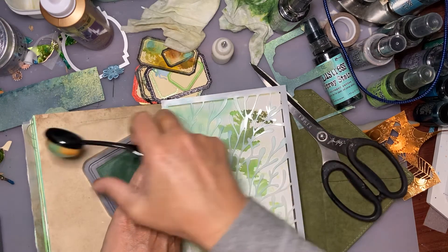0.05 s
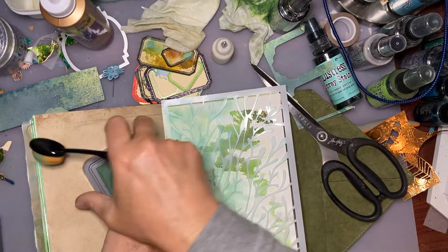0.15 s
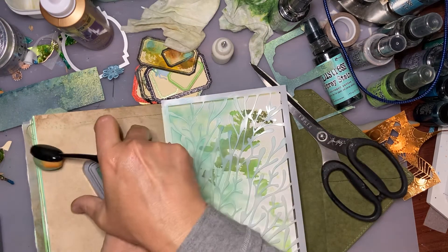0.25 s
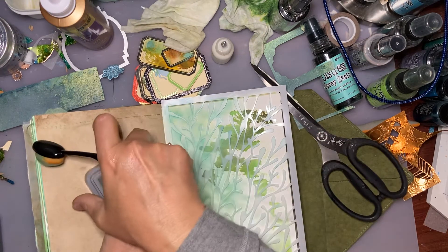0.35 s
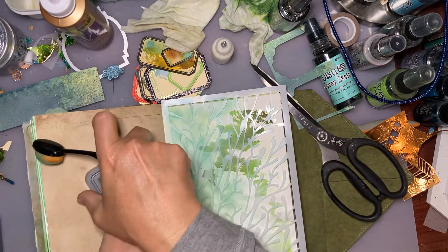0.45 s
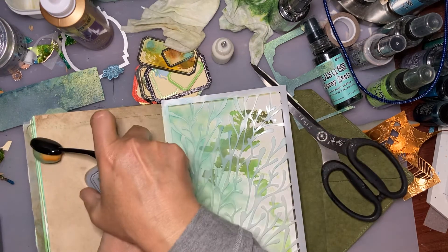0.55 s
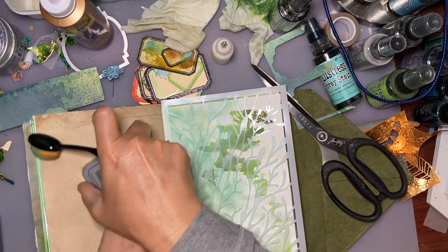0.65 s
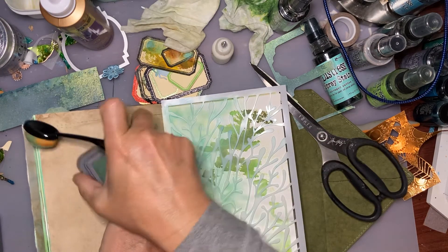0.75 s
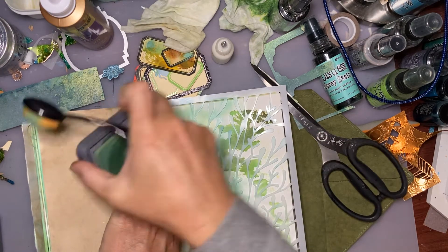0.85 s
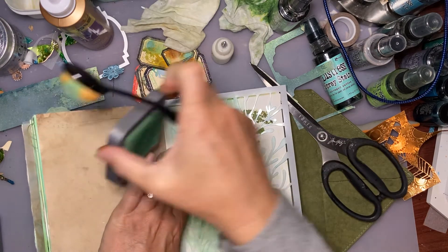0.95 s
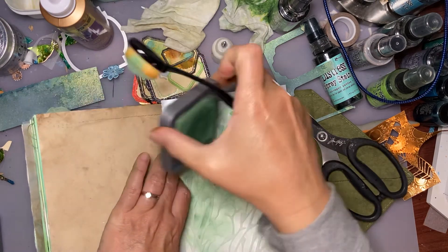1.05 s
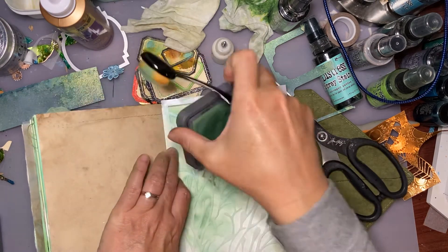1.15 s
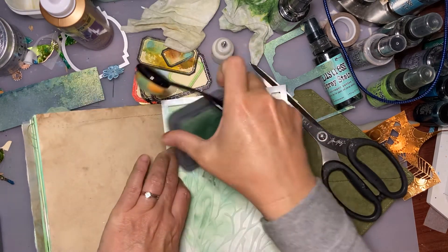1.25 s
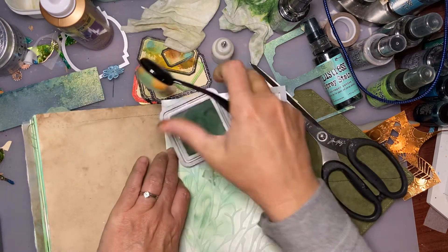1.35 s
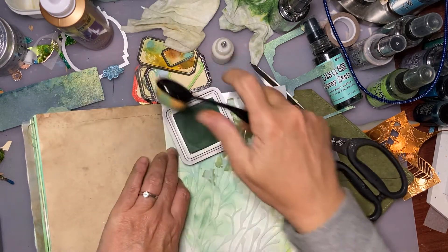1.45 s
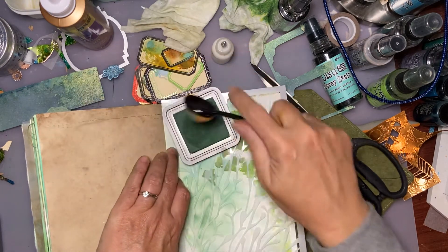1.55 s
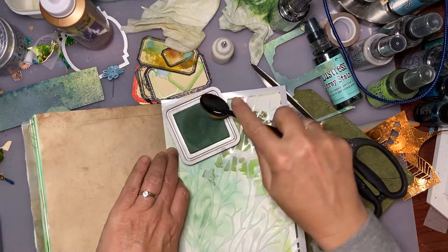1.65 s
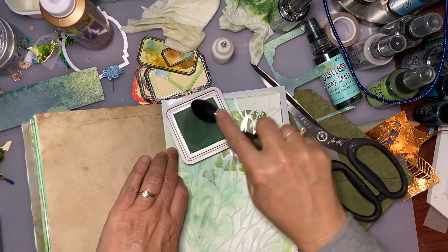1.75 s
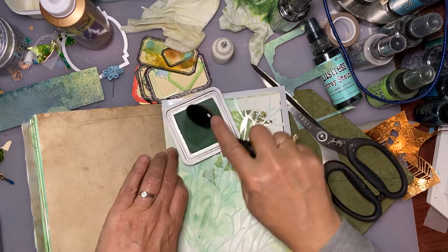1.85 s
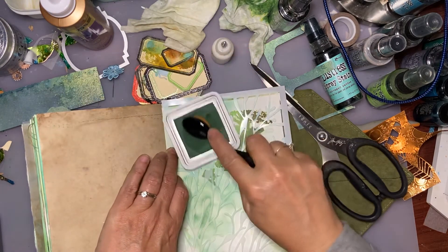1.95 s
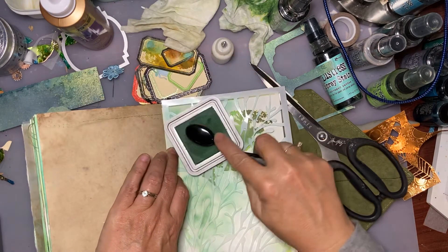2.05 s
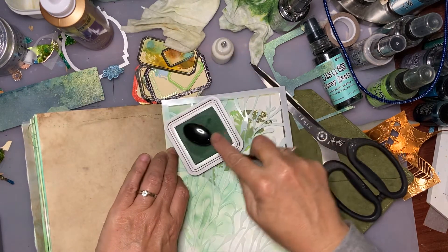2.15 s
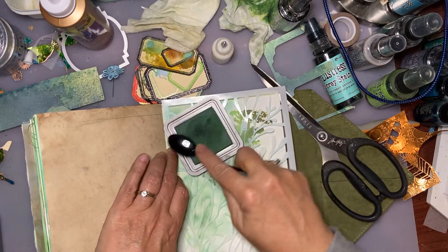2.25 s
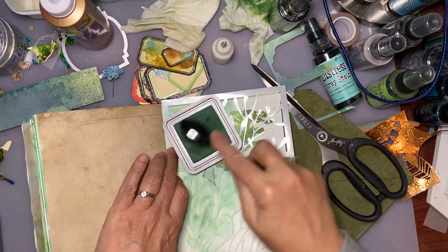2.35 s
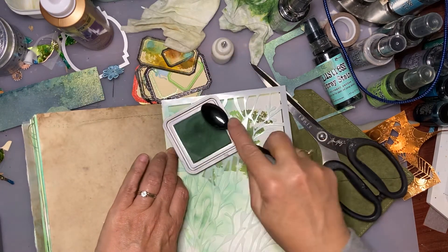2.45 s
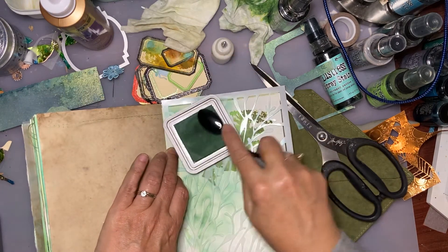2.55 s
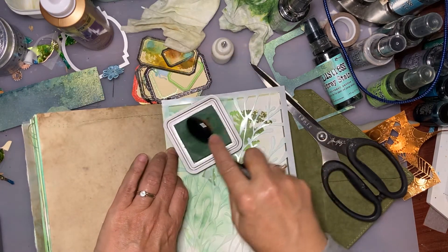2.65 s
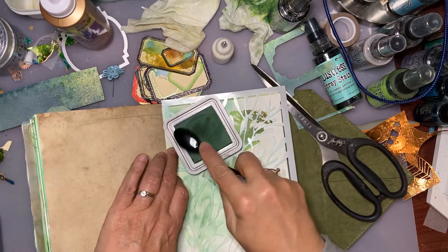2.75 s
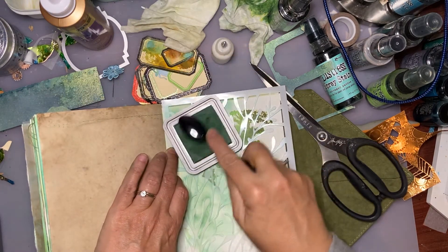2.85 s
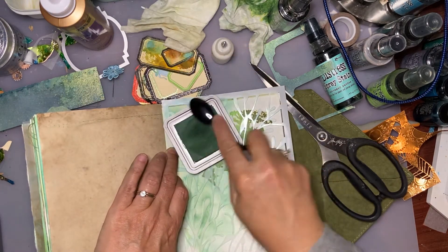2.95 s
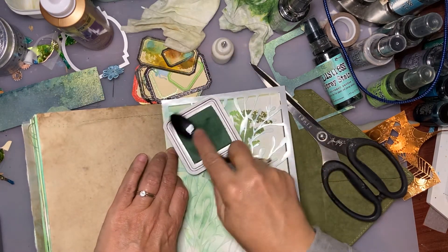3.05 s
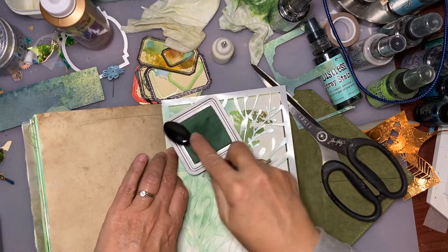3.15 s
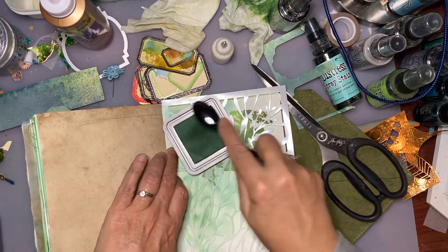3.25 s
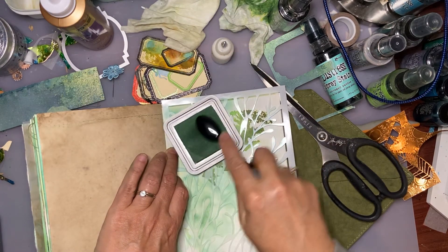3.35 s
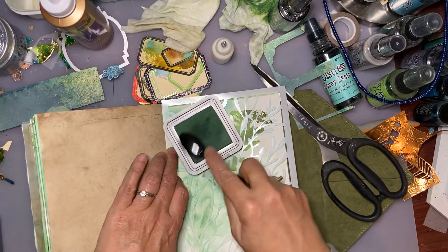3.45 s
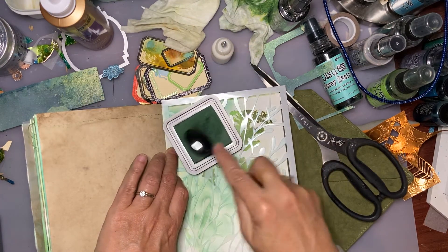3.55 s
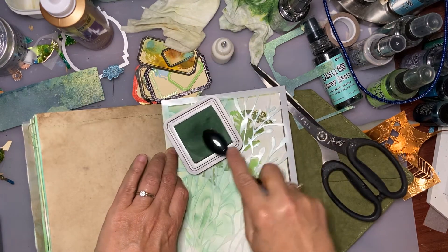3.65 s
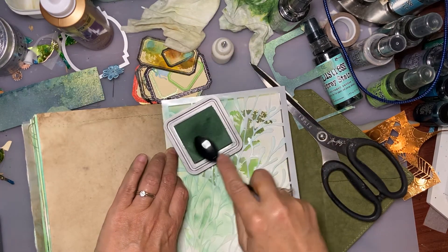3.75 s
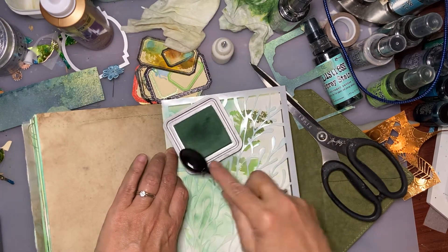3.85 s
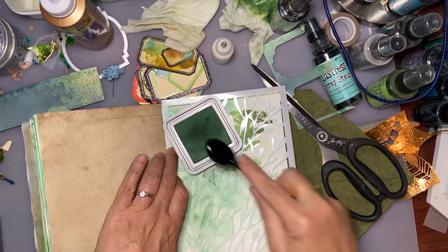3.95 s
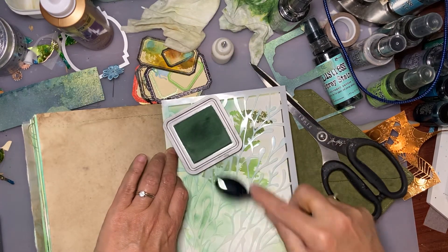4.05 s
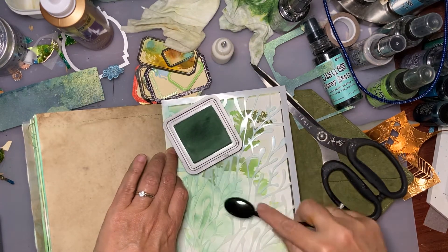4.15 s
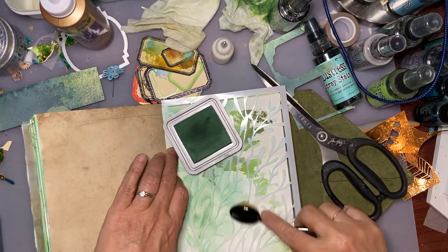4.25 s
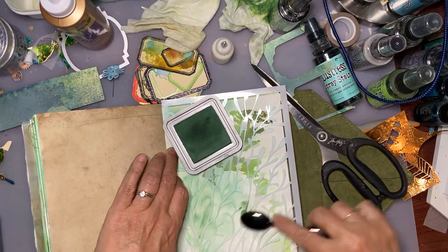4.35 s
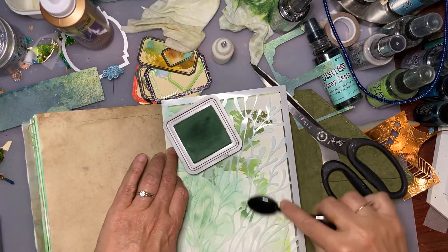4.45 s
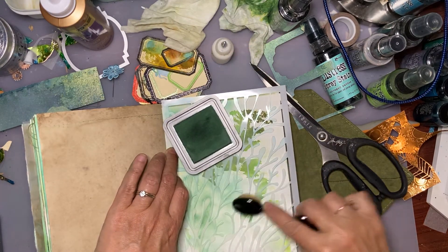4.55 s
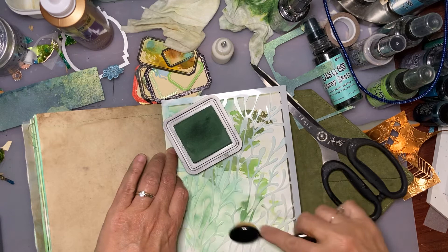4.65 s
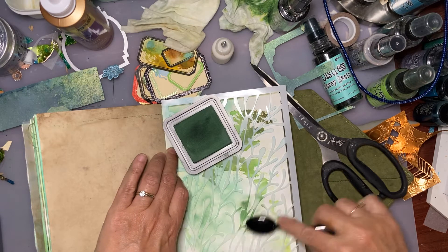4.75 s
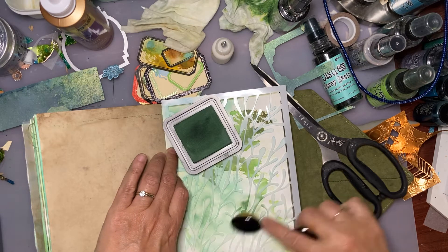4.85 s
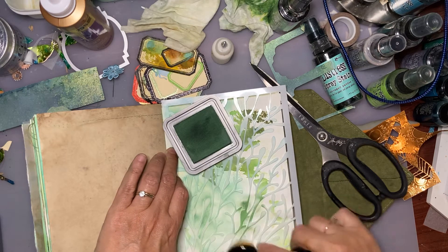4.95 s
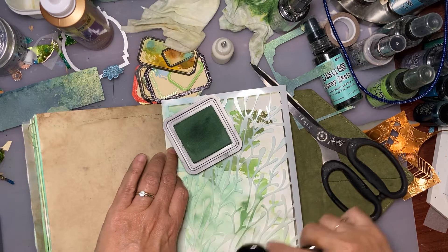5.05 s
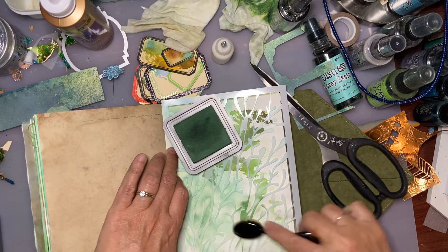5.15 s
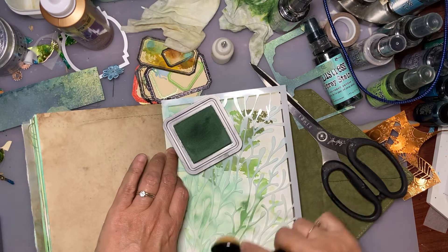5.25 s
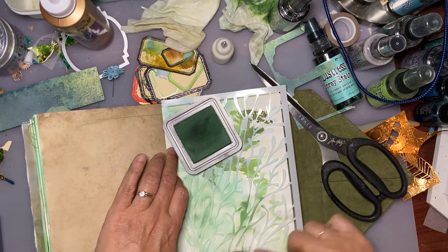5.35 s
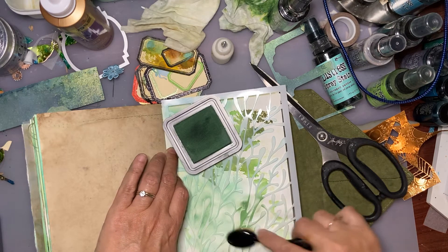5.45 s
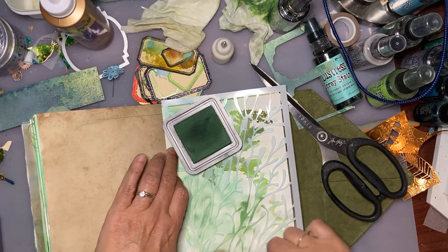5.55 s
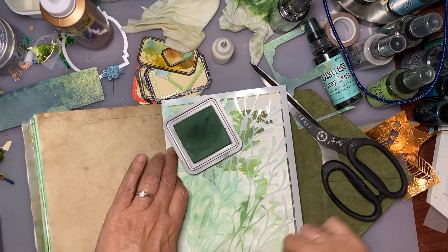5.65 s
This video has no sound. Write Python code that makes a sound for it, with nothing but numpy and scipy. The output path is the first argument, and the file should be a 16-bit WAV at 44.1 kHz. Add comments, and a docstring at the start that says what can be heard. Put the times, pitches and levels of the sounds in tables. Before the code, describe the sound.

A quiet indoor craft table, heard close by a phone with two microphones, over a wavering low rumble and very faint hiss. From 0 to 0.9 s fingers shift a plastic ink pad: a small tick at the start, then brief dry scrapes, strongest around 0.3 and 0.6 to 0.75 s. At 1.2 to 1.45 s the pad is set down with a rapid cluster of hard plastic clacks, hollow rattling and short low table thumps, clearly the loudest event. From 1.7 to 3.9 s a soft brush works over the pad: faint bristly swishes and uneven taps with small clicks and light table bumps, more distinct near 2.3, 3.15 and 3.35 s; a thin scratch of the pad shows near 1.9 s. From 4.2 s to the end the brush swirls over paper, a soft fluctuating dry rustle with sparse ticks and muffled low bumps near 5.4 s. Very short room tail.

```python
"""Ink pad and brush on a craft table

Hands slide a plastic ink pad and set it down; a soft brush swipes over the pad, then swirls over a stencil on paper.
Rubs are dense noise slips ringing resonances; plastic ticks are a noise crack and a rough tone.
Blows ring decaying low modes of the table top; filtered noise gives the room's rumble and hiss.
A phone with two microphone ports hears it: near sounds reach the ports with a phase and level gap."""
import sys
import numpy as np
from scipy import signal
from scipy.fft import rfft, irfft
from scipy.io import wavfile
from scipy.ndimage import uniform_filter1d

SR = 44100
rng = np.random.default_rng(int(sys.argv[2]) if len(sys.argv) > 2 else 0)


def transcribe(u):
    """Save the signal u as a 16-bit wav file named by the first command-line argument.

    u: samples, shape (n,) or (channels, n), limited to [-1, 1]; the rate is SR.
    q: integer samples, one column per channel.
    """
    v = np.clip(np.atleast_2d(u).T, -1, 1)
    q = np.round(v * 32767).astype(np.int16)
    wavfile.write(sys.argv[1], SR, q)


N = 250929
TIME_S = np.arange(N) / SR
BIN_HZ = np.arange(N // 2 + 1) * SR / N + 1e-3  # offset keeps the log finite

# Brush swipes over the pad. Each row: start in seconds, rise in seconds, hold in seconds, bristle level in dB,
# change over the hold in dB, then paper body, rasp and fine hiss in dB re bristles.
BRUSH_STROKES = [(1.715, 0.052, 0.085, -73.5, -2, -14, -11, -1.5),
                 (1.825, 0.015, 0.043, -67, 3.5, -2, -1.5, -2.5),
                 (1.9, 0.063, 0.014, -52.5, -7.5, -5, 0, -2), (1.99, 0.013, 0.032, -68, -0.5, -4.5, -5, 0),
                 (2.115, 0.036, 0.073, -63.5, -2.5, -11, -9, 3),
                 (2.205, 0.028, 0.044, -67.5, -4, 4, 1.5, 3), (2.3, 0.011, 0.052, -63, -5, -0.5, -1, -2),
                 (2.505, 0.0048, 0.028, -69.5, 5.5, 2.5, -4, -2),
                 (2.55, 0.027, 0.17, -67.5, 0, -8.5, -6.5, 4.5),
                 (2.96, 0.024, 0.11, -66.5, -1, -6.5, -6.5, 4), (3.14, 0.01, 0.045, -69, -8, -1.5, 0.5, -1),
                 (3.312, 0.0075, 0.038, -56.5, -3.5, -2.5, -3, 0.5),
                 (3.355, 0.016, 0.056, -57.5, -4, -4.5, -5.5, 2),
                 (3.669, .004, 0.06, -58, -7.5, -6, -2, 3.5), (3.71, 0.02, 0.04, -64.5, 3.5, -13, -7, 2.5),
                 (3.82, 0.0084, 0.042, -71.5, -4.5, 2.5, 1, 2.5)]
# Bristles catch as the brush lands or turns. Each row: start in seconds, bristle level in dB, fade T60 in seconds,
# then paper body and rasp in dB re bristles.
BRISTLE_CATCHES = [(1.762, -72, 0.063, -8.5, 3.5), (1.884, -69.5, 0.05, 11, 4), (1.975, -60, .12, 5, 0),
                   (2.033, -60.5, 0.065, -4, -15), (2.088, -75, 0.16, 6, 5.5),
                   (2.292, -51.5, 0.094, -4, -2), (2.535, -61.5, 0.18, 0, 1), (2.772, -66, 0.24, -3.5, -1),
                   (2.929, -56.5, 0.3, 2, 2), (2.958, -61, 0.089, 5, 4), (3.134, -54.5, 0.064, -5.5, -3),
                   (3.343, -43.5, 0.05, -6, -9), (3.468, -59.5, 0.061, -2.5, 3.5),
                   (3.642, -59, 0.26, 3, -1.5), (3.715, -64, 0.058, 2, 7), (3.81, -59.5, 0.061, -9.5, -3.5),
                   (4.182, -65.5, 0.093, -12, -1), (4.21, -62.5, 0.032, 2.5, 9.5),
                   (4.408, -58.5, 0.13, -5.5, -4), (4.548, -65.5, 0.067, -2, 11)]
# The brush circles over the stencil. Each row: time in seconds, bristle level in dB,
# then paper body and fine hiss in dB re bristles.
SWIRL_LEVELS = [(4.225, -65, -10.5, 0.5), (4.367, -65, -6.5, -3), (4.391, -63.5, -18, 0),
                (4.423, -63.5, -11, -13), (4.481, -72.5, -11, 0), (4.539, -62, -18, 2.5),
                (4.563, -59, -8, -4.5), (4.729, -79, -3, 14.5), (4.745, -58, -14, -5.5),
                (4.831, -69, -8.5, -0.5), (4.881, -65, -15, 2), (5.043, -61.5, -11.5, -0.5),
                (5.069, -64, -23, 1.5), (5.179, -63.5, -4.5, 0.5), (5.403, -64.5, -15, 2.5),
                (5.475, -65.5, -9, -6), (5.545, -60, -25, 2), (5.573, -60, -6.5, 2), (5.647, -68, -14, -1),
                (5.69, -55, -11.5, 0)]
# Fingers shift and slide the pad. Each row: start in seconds, rise in seconds, hold in seconds, scrape level in dB,
# change over the hold in dB, then hollow body, rasp and fine hiss in dB re scrape.
PAD_SLIDES = [(.036, 0.0093, .002, -58.5, -0.5, -6.5, -8, -10.5), (.05, .01, 0.047, -76.5, -15.5, -3, 1, 4),
              (.18, 0.017, .002, -72.5, -2, -24, -2, -18), (.257, 0.0035, .015, -68.5, -5, 13, -2, 6.5),
              (.262, 0.031, 0.051, -50.5, -14, -6.5, -2.5, -3), (.37, 0.011, 0.035, -81.5, -13, 13, -11, 0),
              (.46, .016, .03, -83, -2, -14, -7, 3), (.558, 0.036, 0.078, -54.5, -10, -10.5, -4, -9.5),
              (.645, .05, 0.05, -48, 7, -29, -8.5, -16), (.745, 0.012, 0.0062, -49, -6, -8.5, -4, -5),
              (.81, 0.069, .005, -70, -7, -17, -13, 7.5), (.89, 0.037, 0.0027, -62.5, -3, -16, -17, 5)]
# The pad is set down on the stencil and rattles to rest. Each row: start in seconds, scrape level in dB,
# fade T60 in seconds, then hollow body and rasp in dB re scrape.
PAD_RATTLES = [(1.2, -55, 0.25, 3, 1), (1.239, -47, 0.12, -4, -6), (1.291, -40, 0.11, -2.5, -0.5),
               (1.305, -43.5, 0.14, 3.5, 2), (1.317, -36, 0.15, -3, -1), (1.343, -45, 0.18, -1, 0),
               (1.366, -48, .15, 1, 1), (1.388, -48.5, 0.098, -18, -7), (1.412, -62, 0.058, -3, 10),
               (1.44, -67, 0.12, -7, -2)]
# The pad chafes on the stencil, a narrow scratch. Each row: start in seconds, rise in seconds, hold in seconds,
# level in dB, change over the hold in dB.
PAD_CHAFES = [(1.825, 0.013, .003, -59, 0), (1.85, 0.018, 0.014, -60, -3), (1.905, 0.024, .002, -54, 1.5),
              (1.94, .028, .003, -63, -3)]
# Resonances of the rubbed parts. Each row: centre in Hz, width in Hz, relative level in dB.
BRISTLE_PEAKS = [(3170, 460, -5), (3680, 200, -2.5), (4337, 870, -0.5), (5290, 300, -2.5), (6030, 390, -5),
                 (6250, 220, -4), (7040, 300, -1.5), (7870, 800, -3)]
PAPER_PEAKS = [(343, 118, -9), (543, 123, -10), (808, 73, -0.5), (961, 168, -1.5), (1175, 220, -9)]
SLIDE_SCRAPE_PEAKS = [(2980, 360, -3), (3410, 210, 2.5), (3880, 200, 4), (4520, 410, -8.5), (5450, 340, -6),
                      (6200, 1600, -14), (7530, 930, -16.5), (7850, 440, -18)]
SLIDE_BODY_PEAKS = [(420, 81, -5.5), (643, 170, -3.5), (920, 340, -6.5), (1130, 134, 3.5)]
SLIDE_RASP_PEAKS = [(1530, 900, -5), (2130, 410, 1), (2420, 210, 4), (2920, 690, 0.5)]
PAD_SCRAPE_PEAKS = [(3200, 1000, 2), (3800, 410, 3.5), (4670, 1030, 2.5), (5210, 630, -4), (5770, 420, 1.5),
                    (6700, 560, 1.5), (7400, 420, 1.5), (8000, 660, -0.5)]
PAD_BODY_PEAKS = [(446, 510, -5), (798, 150, 0), (924, 129, 1.5), (962, 138, -8), (1170, 260, -8)]
RASP_PEAKS = [(1399, 205, -2), (1732, 217, -0.5), (2043, 290, 1.7), (2370, 200, -0.41), (2867, 560, -2.1)]
FINE_HISS_PEAKS = [(10000, 2860, 7), (10260, 750, 3.5), (11450, 1200, -2), (12300, 2100, 3),
                   (14200, 2400, -5.5), (15800, 1200, 0)]
CHAFE_PEAKS = [(2420, 250, 9), (2480, 380, 0)]
# Ticks of plastic on plastic. Each row: start in seconds, crack level in dB, pitch in Hz, ring in dB re crack.
PLASTIC_TICKS = [(0.0424, -39, 2820, -17), (0.2614, -60, 1210, -9), (0.7238, -53, 2800, -7),
                 (0.9311, -49.5, 1850, -5.5), (1.2059, -35, 1096, -8), (1.2456, -58, 760, -10),
                 (1.2962, -27, 978, 0), (1.3234, -23.5, 870, -18), (1.3494, -28.5, 2200, -5),
                 (1.4194, -37.5, 876, -9), (1.5683, -58.5, 840, -18), (1.7635, -62, 950, -1),
                 (1.888, -54, 2050, 9.5), (1.9804, -48.5, 950, 17), (2.0373, -46, 876, -19),
                 (2.0857, -54, 1426, 1), (2.2936, -38.5, 865, -10), (2.337, -58, 1970, -12),
                 (2.357, -48, 2080, -10), (2.37, -42.5, 2200, -19), (2.508, -58, 1050, 0),
                 (2.5396, -50, 1080, 3), (2.7744, -55, 3000, -1), (2.815, -59, 3870, -2),
                 (2.848, -60.5, 3900, 4.5), (2.88, -62, 3840, 2), (2.9332, -46, 2044, -8),
                 (3.1374, -35.5, 2830, -8), (3.3164, -53, 964, -15), (3.3498, -33.5, 1020, -10),
                 (3.4688, -48.5, 1916, 3.5), (3.646, -43.5, 900, -10), (3.6745, -39, 3000, -9),
                 (3.8137, -51, 960, -14), (3.8636, -56, 820, -8), (4.1877, -55, 1910, -12),
                 (4.2163, -52, 2260, -5), (4.4114, -48.5, 2370, 5), (4.5494, -50, 835, 4.5),
                 (4.7398, -55, 970, -1), (4.789, -46, 2400, -1), (5.1844, -45.5, 874, 0),
                 (5.2994, -48.5, 2620, -2)]
# Blows and leans on the table top. Each row: start in seconds, level in dB, extra level of the lowest mode in dB.
TABLE_BLOWS = [(0.26, -49, -4.5), (1.259, -27.5, -29), (1.29, -30.5, -5.5), (1.302, -22, -32),
               (1.329, -34.5, -15), (1.358, -34.5, -18), (1.844, -42, -10), (1.951, -45, -9),
               (2.522, -44.5, -7), (2.939, -37, -34), (3.138, -49.5, -5), (3.321, -43.5, -18),
               (3.351, -52, -18), (3.653, -44.5, -5.5), (5.35, -49.5, 2), (5.373, -42.5, -4.5),
               (5.4, -49, -5), (5.44, -45, -5.5)]
# Table top modes. Each row: frequency in Hz, relative level in dB, T60 in seconds.
TABLE_MODES = [(73.4, 4, 0.28), (94, -17.5, .2), (118.4, -7.5, 0.44), (132.4, 1, 0.06), (138.8, -2, 0.26),
               (164.9, -2, 0.17), (207.8, -9, 0.48), (260, -9, 0.09), (378, -4, 0.12), (490, -24.5, 0.11)]
# Rumble resonances. Each row: centre in Hz, width in Hz, relative level in dB.
RUMBLE_PEAKS = [(44.4, 13, -11), (67.6, 18, -0.5), (99, 25.6, -7), (135, 16.2, -3), (152.2, 24, -13.5),
                (202.7, 12.9, -9)]
# Rumble level. Each row: time in seconds, level in dB.
RUMBLE_LEVELS = [(0.0, -54), (0.62, -54.5), (1.11, -55.5), (1.38, -53.5), (1.73, -55.5), (3.23, -52),
                 (4.2, -57.5), (4.75, -54.5), (5.23, -56.5), (5.69, -53.5)]
# Hiss spectrum shape. Each row: frequency in Hz, relative density in dB per Hz.
HISS_SPECTRUM = [(200, 5), (300, -19.5), (700, -11.5), (1500, -20.5), (4000, -25), (8000, -29),
                 (9800, -39.5), (10500, -8.5), (11300, -23.5), (13000, -34.5), (14000, -61.5)]
# Likeness of the two ports, for the hiss and for near sounds. Each row: frequency in Hz, correlation from 0 to 1.
HISS_CORRELATION = [(200, .9), (640, 0.13), (1400, 0.1), (3000, 0.009), (17000, .01)]
NEAR_CORRELATION = [(200, 0.85), (600, 0.64), (1200, 0.54), (3000, 0.31), (6000, 0.21), (7000, 1),
                    (16000, 1)]
# Phase gap of near sounds. Each row: frequency in Hz, lead of the left port in radians.
PORT_LEAD = [(1000, 0), (2200, .3), (3000, 1.5), (5700, 2.6), (6900, 0), (15700, -4 * np.pi)]
# Level gap of near sounds. Each row: frequency in Hz, left minus right in dB.
PORT_LEVEL_GAP = [(200, 3.5), (1000, 3.5), (2000, 3), (4000, 1.5), (8000, -0.6), (16000, 1)]

RISE_DB = 26  # strokes and bursts swell from this far below their level
BRUSH_FADE_S, SLIDE_FADE_S, CHAFE_FADE_S = 0.17, 0.046, 0.16  # T60
CATCH_RISE_S, CATCH_HISS_DB = 0.0057, -0.5
PAD_RISE_S, PAD_HISS_DB = 0.0076, -2
SWIRL_RASP_DB, SWIRL_RASP_SHARE = -2, 0.44  # the rasp follows the paper body in part
TICK_T60_S, CONTACT_S = 0.032, 0.0044
ROOM_T60_S, ROOM_DB = 0.17, -17
HISS_DB = -73.5
LOW_CUT_HZ, TOP_HZ = 46, 15800


def brush():
    """Swipes, catches and swirls of bristles excite bristles, paper, rasp and fine hiss."""
    power = strokes(BRUSH_STROKES, BRUSH_FADE_S)
    power = power + bursts(BRISTLE_CATCHES, CATCH_RISE_S, CATCH_HISS_DB)
    power = power + swirl()
    bodies = (BRISTLE_PEAKS, PAPER_PEAKS, RASP_PEAKS, FINE_HISS_PEAKS)
    return rubbing(power, bodies, grain_db=3.0, patchy_db=3.0, drift_db=-0.74)


def swirl():
    """Power of each layer while the brush circles: levels glide from point to point."""
    time_s, bristle_db, body_db, hiss_db = np.transpose(SWIRL_LEVELS)
    level = np.interp(TIME_S, time_s, bristle_db, left=-200)
    body = np.interp(TIME_S, time_s, body_db)
    rasp = SWIRL_RASP_DB + SWIRL_RASP_SHARE * body
    hiss = np.interp(TIME_S, time_s, hiss_db)
    return undb([level, level + body, level + rasp, level + hiss]) ** 2


def pad_slide():
    """Fingers shift the pad; its scrape rings the hollow body, a rasp and a fine hiss."""
    bodies = (SLIDE_SCRAPE_PEAKS, SLIDE_BODY_PEAKS, SLIDE_RASP_PEAKS, FINE_HISS_PEAKS)
    return rubbing(strokes(PAD_SLIDES, SLIDE_FADE_S), bodies, grain_db=2.5, patchy_db=4.0, drift_db=-0.4)


def pad_set_down():
    """The pad rattles to rest in short scrapes that ring its hollow body."""
    power = bursts(PAD_RATTLES, PAD_RISE_S, PAD_HISS_DB)
    bodies = (PAD_SCRAPE_PEAKS, PAD_BODY_PEAKS, RASP_PEAKS, FINE_HISS_PEAKS)
    return rubbing(power, bodies, grain_db=2.0, patchy_db=3.0, drift_db=0.5)


def pad_chafe():
    """The pad rubs the stencil and excites a narrow band."""
    return rubbing(strokes(PAD_CHAFES, CHAFE_FADE_S), (CHAFE_PEAKS,), grain_db=1.5, patchy_db=2.0, drift_db=0.5)


def rubbing(power, bodies, grain_db, patchy_db, drift_db):
    """Dense tiny slips of uneven size ring sets of resonances; each resonance flickers and drifts alone."""
    first, last = np.flatnonzero(power[0] > 1e-15)[[0, -1]]
    out = np.zeros((2, N))  # near and scattered parts
    gains = uniform_filter1d(np.sqrt(power), size=60)
    for gain, peaks in zip(gains, bodies):
        size = undb(grain_db * rng.exponential(size=N))
        slips = (rng.standard_normal((2, N)) * size)[:, first:last]
        rung = 0
        for k, (hz, width_hz, db) in enumerate(peaks):
            wander_db = (patchy_db * walk(70) + drift_db * walk(9))[first:last]
            shifted = np.roll(slips, 999 * k, axis=1)  # decorrelates the resonances
            rung = rung + ring(shifted, hz, width_hz) * undb(db + wander_db)
        out[:, first:last] += gain[first:last] * unit(rung)
    return out


def strokes(rows, fade_s):
    """Power of drawn-out rubs that share one fade."""
    return sum(swell(*row[:5], fade_s, *row[5:]) for row in rows)


def bursts(rows, rise_s, hiss_db):
    """Power of short rubs with the shortest hold."""
    return sum(swell(s, rise_s, 0, db, 0, fade_s, body_db, rasp_db, hiss_db)
               for s, db, fade_s, body_db, rasp_db in rows)


def swell(start_s, rise_s, hold_s, db, change_db, fade_s, *relative_db):
    """Power of each layer in one gesture: it rises, holds while its level drifts, and fades by 60 dB."""
    steps_s = [0, max(rise_s, .001), max(hold_s, .001), max(fade_s, .01)]
    times_s = start_s + np.cumsum(steps_s)
    points_db = db + np.array([-RISE_DB, 0, change_db, change_db - 60])
    level = np.interp(TIME_S, times_s, points_db, left=-200, right=-200)
    return undb(level + np.array((0,) + relative_db)[:, None]) ** 2


def ticks(crack_s=0.015, noisy=0.25):
    """A short wide crack, then a slightly rough ring at the pitch of the struck part."""
    out, t = np.zeros((2, N + SR // 5)), np.arange(SR // 5) / SR
    crack_env = 1000. ** (-t / crack_s) * (1 - np.exp(-t / 0.00048))
    ring_env = 1000. ** (-t / TICK_T60_S) * (1 - np.exp(-t / 0.0041))
    for start_s, db, hz, ring_db in PLASTIC_TICKS:
        crack_noise, ring_noise = rng.standard_normal((2, 2, len(t)))
        crack = ring(crack_noise, 5500, 9600) * crack_env
        tone = np.sin(2 * np.pi * hz * t) + noisy * unit(ring(ring_noise, hz, hz / 4))
        i = int(start_s * SR)
        out[:, i:i + len(t)] += undb(db) * (crack + undb(ring_db) * tone * ring_env)
    return out[:, :N]


def table(left_db=2.0, swell_s=0.0038):
    """Each blow is a smooth push into the modes of the table top, which it strikes at its own spot."""
    out, t = np.zeros(N + SR), np.arange(SR) / SR
    hz, mode_db, t60_s = np.transpose(TABLE_MODES)[:, :, None]
    push = np.hanning(int(CONTACT_S * SR))
    for start_s, db, lowest_db in TABLE_BLOWS:
        spot_db = 2.2 * rng.standard_normal((len(TABLE_MODES), 1))
        gain = undb(db + mode_db + spot_db + lowest_db * (hz == hz.min()))
        modes = np.sum(gain * np.sin(2 * np.pi * hz * t) * 1000. ** (-t / t60_s), axis=0)
        modes *= 1 - np.exp(-t / swell_s)  # the bending wave needs a moment to fill the board
        i = int(start_s * SR)
        out[i:i + SR] += signal.fftconvolve(modes, push / push.sum())[:SR]
    return panned(out[:N], left_db)


def ports(near, scattered, likeness, close=False):
    """The scattered part is in antiphase; a close source also reaches the ports with a phase and level gap."""
    likeness, side = np.clip(likeness, 0, 1), np.array([[1], [-1]])
    common = np.sqrt((1 + likeness) / 2) * rfft(near)
    mix = common + np.sqrt((1 - likeness) / 2) * rfft(scattered) * side
    if close:
        lead_rad = np.interp(BIN_HZ, *np.transpose(PORT_LEAD))
        mix = mix * np.exp(.5j * side * lead_rad) * undb(side * along_hz(PORT_LEVEL_GAP) / 2)
    return irfft(mix, N)


def room(x):
    """A short diffuse tail of decaying, darkened noise, its own for each port."""
    t = np.arange(SR // 2) / SR
    tail = rng.standard_normal((2, len(t))) * 1000. ** (-t / ROOM_T60_S) * (t > .004)
    tail = signal.lfilter([1], [1, -.4], tail)
    tail = tail / np.sqrt(np.sum(tail ** 2) / 2)
    return x + undb(ROOM_DB) * signal.fftconvolve(x, tail, axes=1)[:, :N]


def rumble():
    """Noise through a few low resonances, each wavering in level, at rms 1."""
    total = 0
    for hz, width_hz, db in RUMBLE_PEAKS:
        noise = rng.standard_normal(N + SR // 4)  # the extra lets the filter settle
        total = total + undb(db + 1.9 * walk(7.8)) * ring(noise, hz, width_hz)[-N:]
    return unit(total)


def hiss():
    """Steady noise shaped in frequency, with a hump in the treble, at rms 1."""
    return unit(irfft(rfft(rng.standard_normal(N)) * undb(along_hz(HISS_SPECTRUM)) * (BIN_HZ > 150), N))


def background(left_db=1.0, likeness=0.91):
    """Wavering low rumble, much alike at both ports, and a faint hiss."""
    low = ports(rumble(), rumble(), likeness) * undb(np.interp(TIME_S, *np.transpose(RUMBLE_LEVELS)))
    return panned(low, left_db) + undb(HISS_DB) * ports(hiss(), hiss(), along_hz(HISS_CORRELATION))


def undb(db):
    """Gain of a level in dB."""
    return 10 ** (np.asarray(db) / 20)


def unit(x):
    """Scale to rms 1."""
    return x / np.sqrt(np.mean(x ** 2))


def along_hz(points):
    """Read (Hz, value) points at every frequency bin, on a log axis."""
    hz, value = np.transpose(points)
    return np.interp(np.log(BIN_HZ), np.log(hz + 1), value)


def ring(x, hz, width_hz):
    """A resonance applied twice, for steep flanks."""
    b, a = signal.iirpeak(hz, hz / width_hz / 1.51, fs=SR)  # 1.51 offsets the narrowing by two passes
    return signal.lfilter(b, a, signal.lfilter(b, a, x))


def walk(rate_hz):
    """Random levels held 1 / rate_hz seconds and smoothed twice; spread near 1."""
    k = int(SR / rate_hz)
    held = np.repeat(rng.standard_normal(N // k + 1), k)
    return 1.3 * uniform_filter1d(uniform_filter1d(held, k), k)[:N]


def panned(x, left_db):
    """Set left minus right to left_db."""
    return x * undb(np.array([[left_db], [-left_db]]) / 2)


def scene():
    """Close rubbing and ticks through the ports and the room, over the table boom and the background."""
    near, scattered = brush() + pad_slide() + pad_set_down() + pad_chafe() + ticks()
    close = ports(near, scattered, along_hz(NEAR_CORRELATION), close=True)
    return room(close) + table() + background()


def record(dry):
    """The phone cuts the deep bass and the top."""
    low_cut = signal.butter(3, LOW_CUT_HZ, "high", fs=SR, output="sos")
    top_cut = signal.ellip(10, .2, 80, TOP_HZ, fs=SR, output="sos")
    return signal.sosfilt(top_cut, signal.sosfilt(low_cut, dry))


dry = scene()
out = record(dry)
transcribe(out)
```